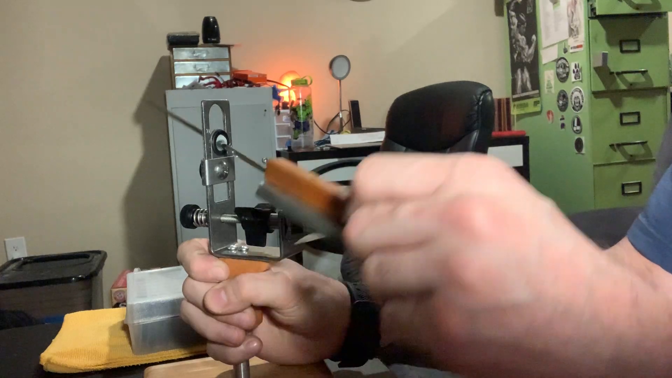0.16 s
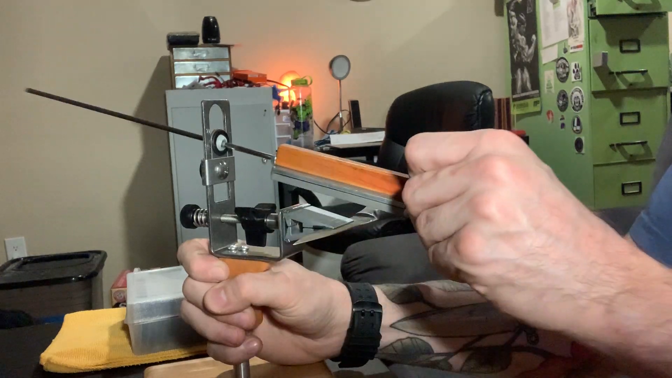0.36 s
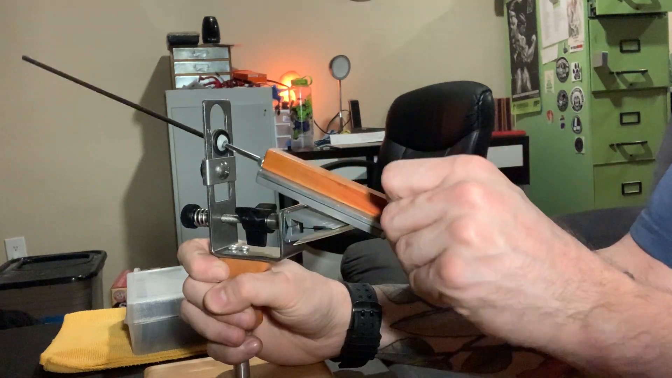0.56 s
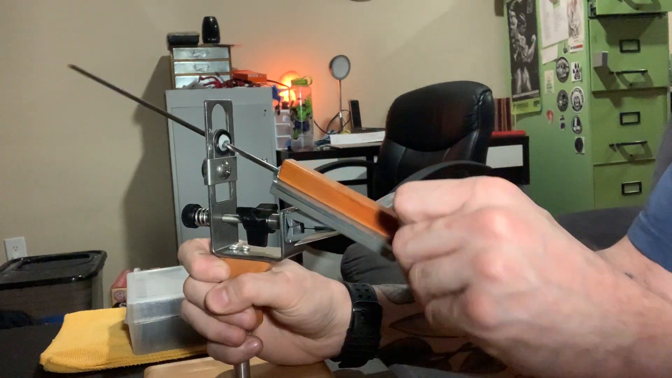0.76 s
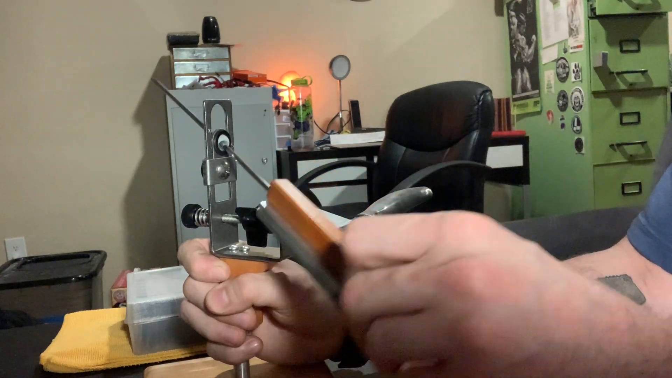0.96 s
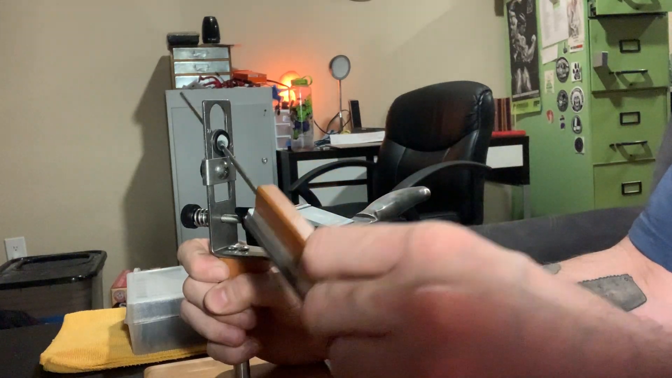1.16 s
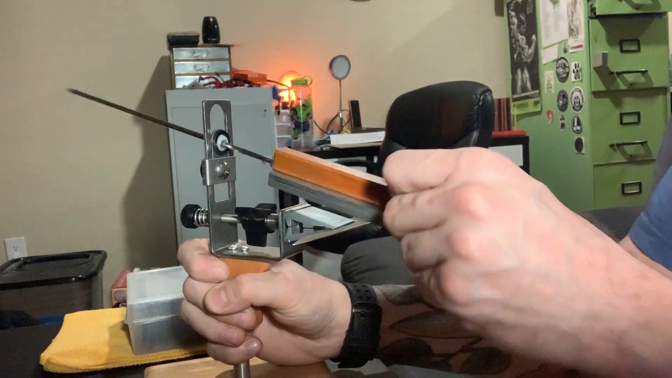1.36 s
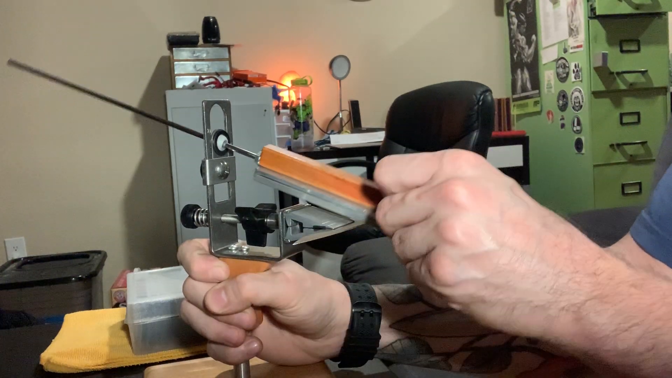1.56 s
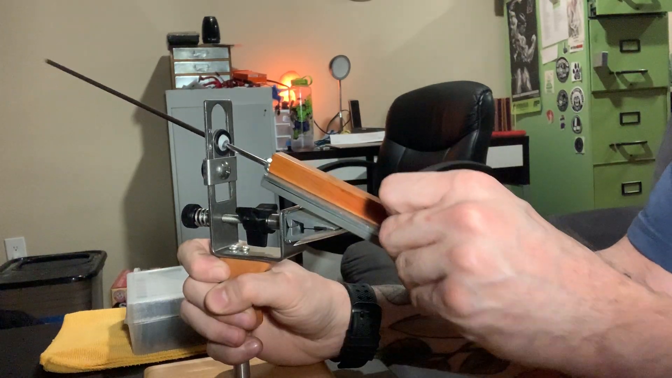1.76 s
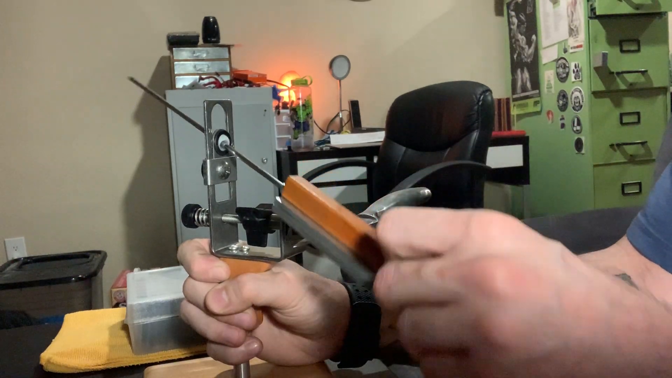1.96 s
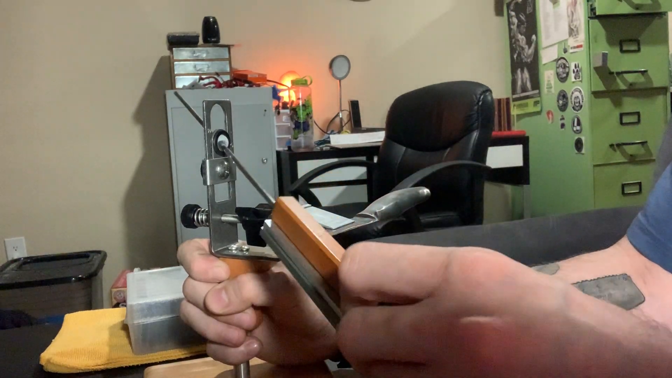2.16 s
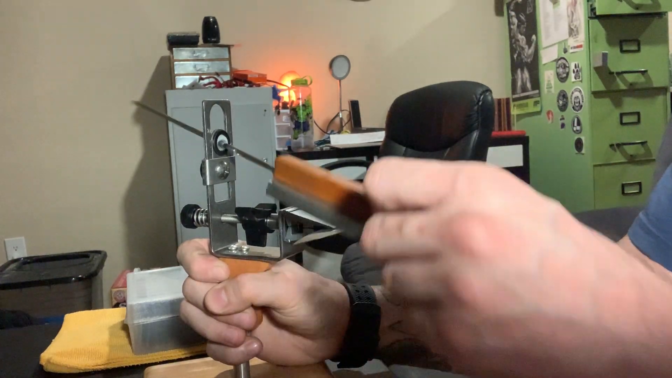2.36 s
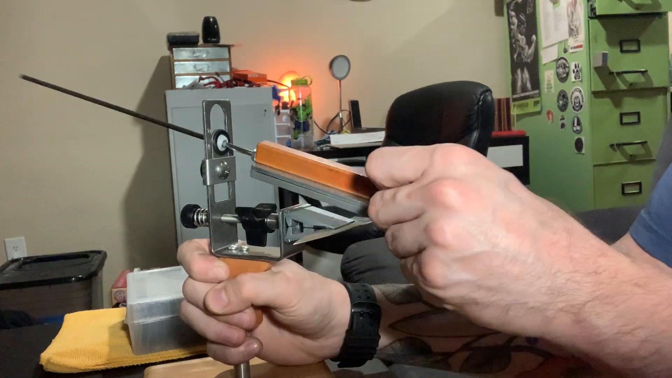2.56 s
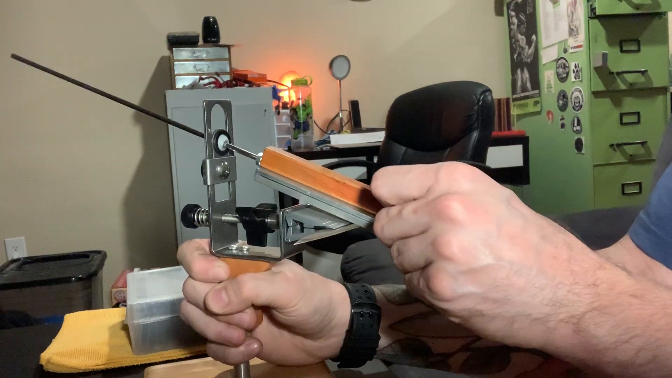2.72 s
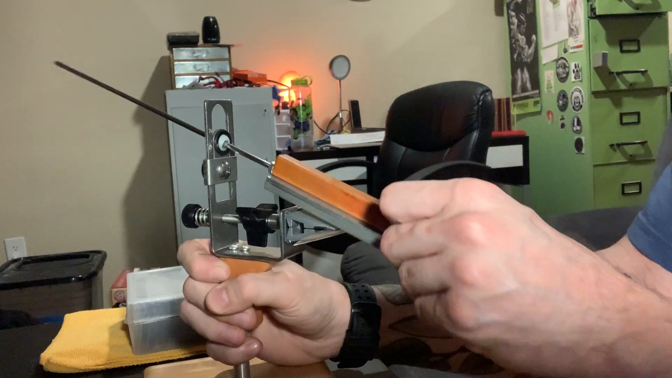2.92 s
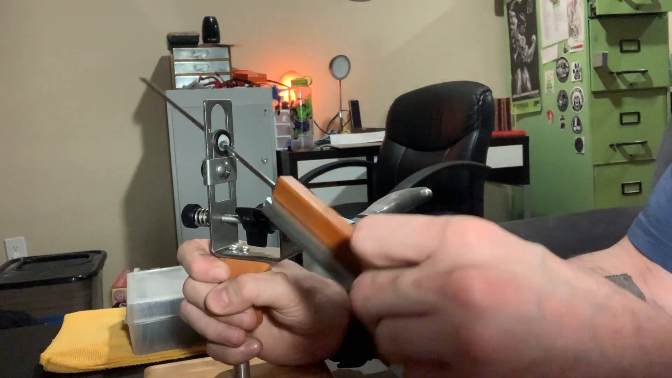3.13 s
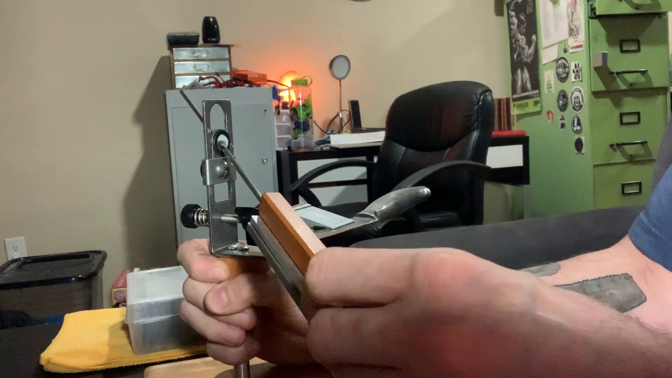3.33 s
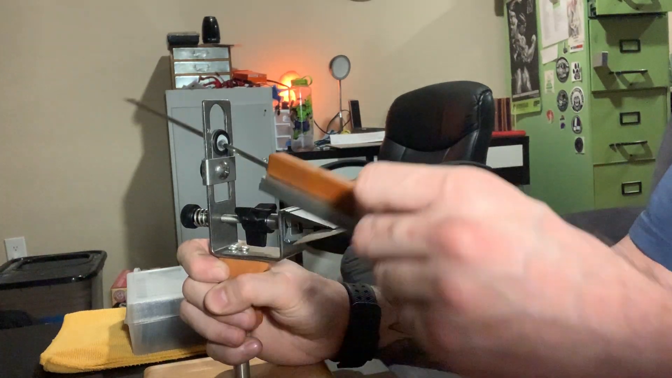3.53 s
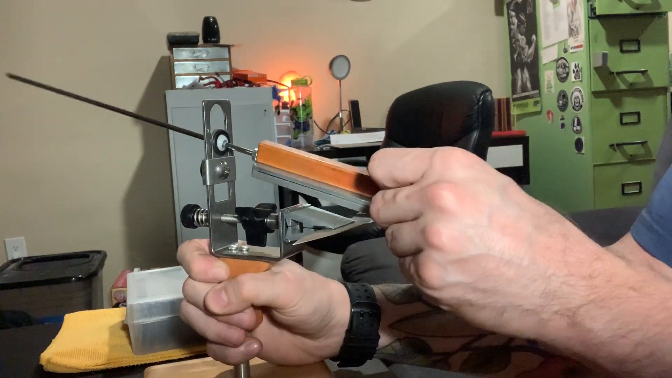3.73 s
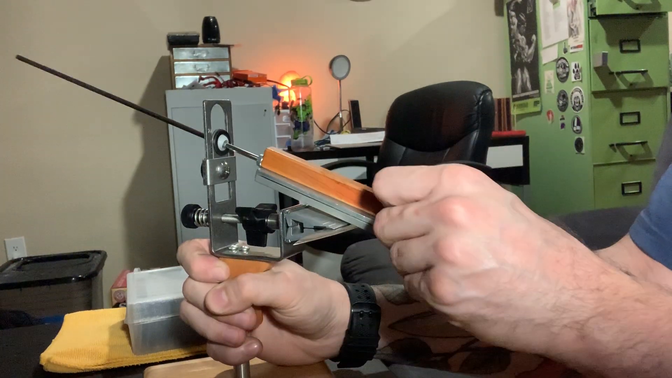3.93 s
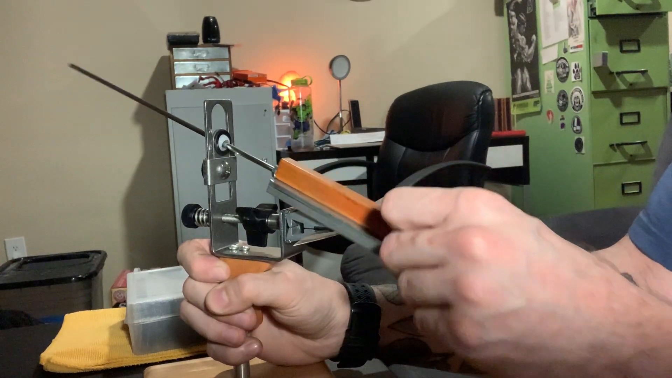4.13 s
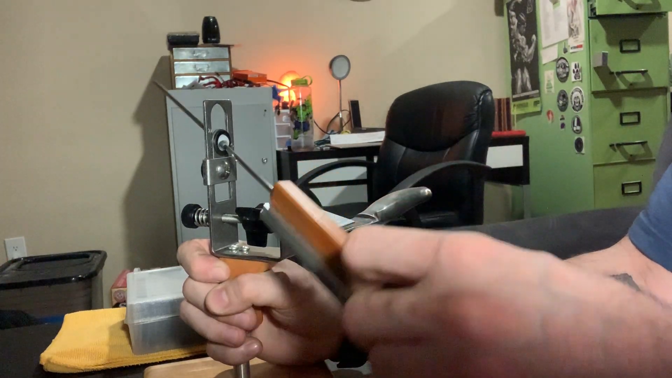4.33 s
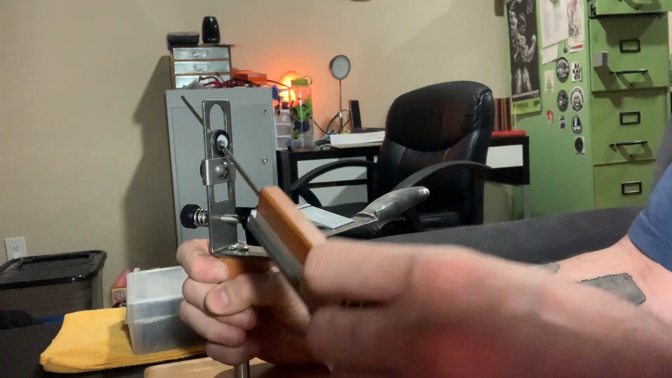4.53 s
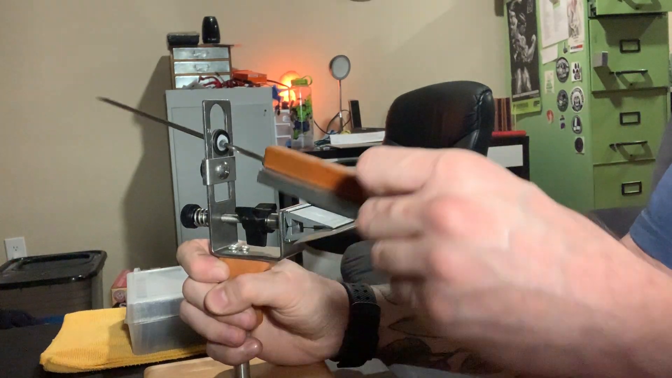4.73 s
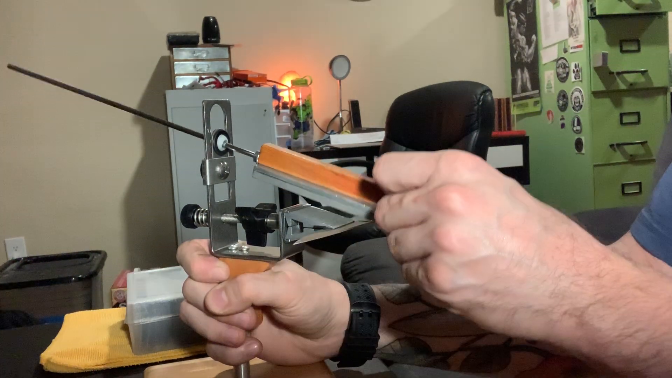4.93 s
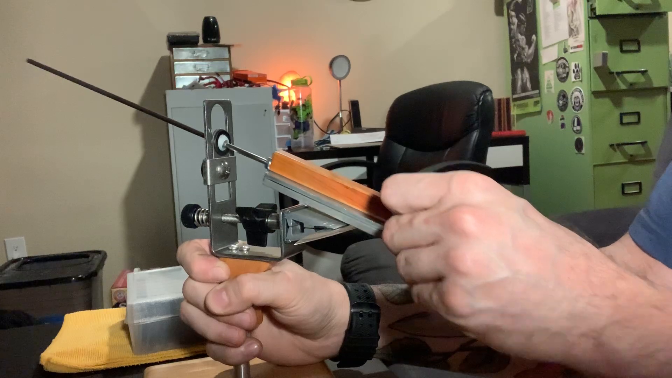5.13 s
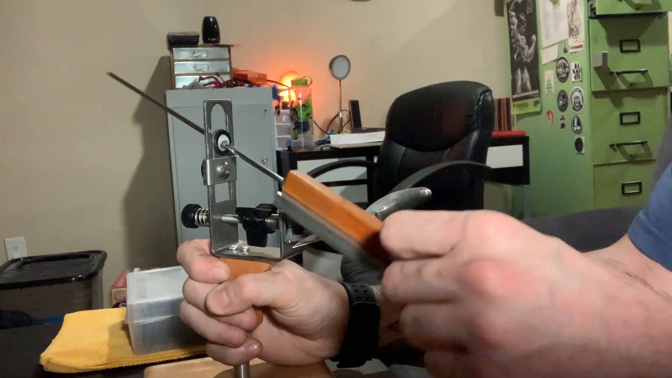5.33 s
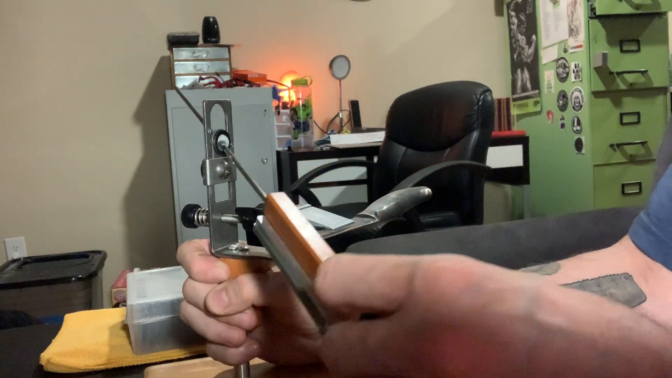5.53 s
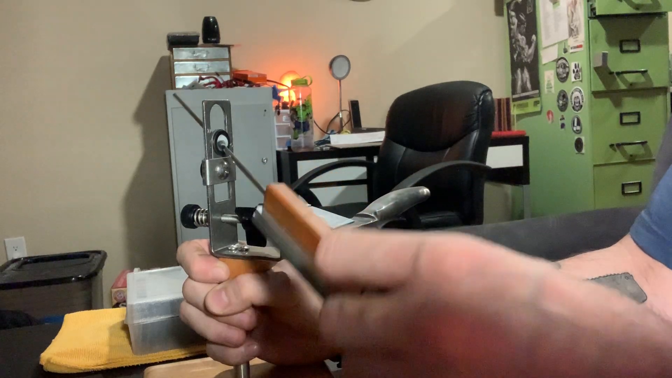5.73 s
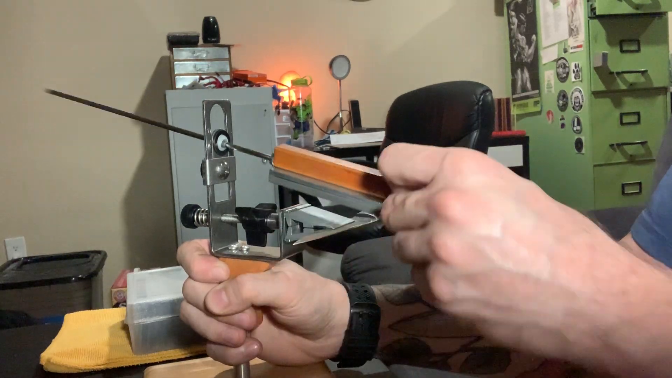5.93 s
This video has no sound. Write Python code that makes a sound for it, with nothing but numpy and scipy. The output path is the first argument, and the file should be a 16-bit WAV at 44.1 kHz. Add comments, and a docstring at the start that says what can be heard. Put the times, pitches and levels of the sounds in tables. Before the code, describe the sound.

A close stereo recording in a small room with short reverberation: a coarse stone on a guide rod is drawn along a clamped knife. At the start, the end of a stroke rubs and squeaks faintly until about 0.1 s. Full strokes land near 0.6, 1.7, 2.8, 3.9 and 5.1 s, each lasting about 0.6 s. A small hard knock with a dull clamp thump opens each one; then a bright, grainy hiss swells with the stone's speed and fades, over thin steel ringing near 1.5 kHz and soft low rumble. A faint rod tone falls while another rises. Sharp little ticks are scattered through the strokes, notably around 0.8, 1.7 to 2.1 and 5.4 s. Slowing ends catch with short rubs and squeals, clearest near 2.1 and 3.25 s. Gaps of about half a second hold barely audible rod sliding, quiet air noise and weak low hum.

```python
"""A coarse stone on a guide rod is drawn along a clamped knife in a small room, stroke after stroke.
The grit hisses in proportion to its speed, blade and edge ring as resonators, and the handle rumbles.
Each landing knocks, coarse grains tick as they snap off, and the slow stone rubs and squeals by stick-slip.
The sliding rod adds one falling and one rising resonance to each stroke; quiet air noise and hum lie beneath."""
import sys
import numpy as np
from scipy import signal
from scipy.fft import rfft, irfft, next_fast_len
from scipy.io import wavfile
from scipy.ndimage import uniform_filter1d, map_coordinates

SR = 44100
rng = np.random.default_rng(int(sys.argv[2]) if len(sys.argv) > 2 else 0)


def bounce(signal):
    """Save signal as a 16-bit WAV file at the path given by the first command-line argument."""
    frames = np.transpose(np.atleast_2d(signal))
    limited = np.clip(frames, -1, 1)
    pcm = np.round(limited * 32767).astype(np.int16)
    wavfile.write(sys.argv[1], SR, pcm)


N = 263718
TIME = np.arange(N) / SR  # s

# Table levels are relative: the functions that play them apply further trims in dB.


def amp(db):
    """Decibel law: 20 dB is a factor of ten in amplitude."""
    return 10 ** (np.asarray(db) / 20)


def unit(x):
    """Normalisation to a root-mean-square value of 1."""
    return x / np.sqrt(np.mean(x ** 2) + 1e-20)


def along(points, hz):
    """Linear interpolation of (f/Hz, value) points on a logarithmic frequency axis."""
    f, v = np.transpose(points)
    return np.interp(np.log(hz + 1), np.log(f + 1), v)


def wobble(rate):
    """Spline interpolation of random knots, rate a second, into a smooth fluctuation."""
    return map_coordinates(rng.standard_normal(int(N * rate / SR) + 4), [TIME * rate])


def filtered(x, response):
    """Linear filtering: the spectrum of x times a complex response of frequency."""
    size = 2 * next_fast_len(x.shape[-1] // 2 + 8192)
    spectrum = rfft(x, size) * response(np.fft.rfftfreq(size, 1 / SR))
    return irfft(spectrum, size)[..., :x.shape[-1]]


def coloured(x, spectrum):
    """Minimum-phase filtering: a folded cepstrum makes the (f/Hz, level/dB) shape causal."""
    def response(hz):
        cepstrum = irfft(np.log(amp(along(spectrum, hz))))
        half = len(cepstrum) // 2
        return np.exp(rfft(np.r_[cepstrum[0], 2 * cepstrum[1:half]], 2 * half))
    return filtered(x, response)


def ringing(x, modes):
    """Modal superposition: parallel damped resonances, of alternating sign, driven by x."""
    def response(f):
        total = 0
        for k, (centre, width, db) in enumerate(modes):
            resonance = 1j * f * width / (centre * centre - f * f + 1j * f * width)
            total = total + (-1) ** k * amp(db) * resonance
        return total
    return filtered(x, response)


def add(track, s, sound):
    """Superposition: mix a sound into a track at s seconds."""
    part = track[max(round(s * SR), 0):][:len(sound)]
    part += sound[:len(part)]


def swells(rows):
    """Gaussian envelopes centred at t/s, down to exp(-2) one length/s away, peaking at level/dB."""
    return sum(amp(db) * np.exp(-2 * ((TIME - s) / length) ** 2) for s, length, db in rows)


def grains(rate, spread_db):
    """Shot noise: tiny fractures of random sign and size, rate a second on average, at rms 1."""
    hit = rng.random(N) < rate / SR
    return unit(hit * rng.choice([-1, 1], N) * amp(spread_db * rng.standard_normal(N)))


def shifting(x, patchy_db):
    """Time-varying spectrum: the moving contact point favours ever different frequencies."""
    z = signal.stft(x, nperseg=512)[2]
    field = uniform_filter1d(rng.standard_normal(z.shape), size=4, axis=0)  # smooth over frequency
    field = uniform_filter1d(field, size=8, axis=1)  # smooth over time
    return unit(signal.istft(z * amp(patchy_db * unit(field)), nperseg=512)[1][:N])


def bent(x, stretch):
    """Time-scale warping: reading x faster raises all its resonances by a moving share."""
    return map_coordinates(x, [np.cumsum(1 + stretch) % (N - 1)])


def burst(t60, spike_db):
    """Impulsive excitation: a sharp break in a crunch of noise that falls 60 dB in t60 seconds."""
    t = TIME[:SR // 8]
    crunch = rng.standard_normal(len(t)) * amp(-60 * t / t60)
    crunch[SR // 2000] += amp(spike_db)
    return crunch


# spectrum of the room noise: f/Hz, level/dB
AIR_SPECTRUM = [(15, -92), (25, -15.5), (72, -1), (161, -4), (206, -4), (285, -8), (317, -14), (394, -13.5),
                (677, -17.5), (754, -20), (1400, -25.5), (1740, -24.5), (4250, -34.5), (12500, -43),
                (16000, -50)]
# left-right correlation of that noise: f/Hz, likeness/1
AIR_LIKENESS = [(60, 0.348), (200, 0.217), (500, 0.033), (2000, 0.029)]
# tones of the hum: f/Hz, level/dB
HUM_TONES = [(120, -87), (140, -73.5), (210, -68.5), (241, -97.5), (280, -77)]
AIR_DB = -60.5  # rms level of the noise


def air():
    """Partial coherence: mid and side noises set the left-right likeness; a faint unsteady hum joins them."""
    mid, side = unit(coloured(rng.standard_normal((2, N)), AIR_SPECTRUM))

    def turn(hz):
        return np.arccos(np.clip(along(AIR_LIKENESS, hz), -1, 1)) / 2

    mid = filtered(mid, lambda hz: np.cos(turn(hz)))
    side = filtered(side, lambda hz: np.sin(turn(hz)))
    hum = 0
    for hz, db in HUM_TONES:
        phase = 2 * np.pi * hz * TIME + 1.26 * wobble(11)
        hum = hum + amp(db + 2.0 * wobble(18)) * np.sin(phase)
    return amp(AIR_DB) * np.array([mid + side, mid - side]) + hum


# reverberation time of the room: f/Hz, t60/s
ROOM_DECAY = [(150, 0.35), (1500, 0.21), (6000, 0.27), (14000, 0.11)]
# strength of the room's answer: f/Hz, level/dB
ROOM_LEVEL = [(80, -9.5), (450, 3), (1400, -13), (3000, -0.5), (6000, -3.5), (9000, -3), (13000, -19)]


def room(x):
    """Diffuse reverberation: decaying noise, different at each microphone, is the walls' impulse response."""
    hz, t, z = signal.stft(rng.standard_normal((2, SR // 3)), SR, nperseg=256)
    decay = amp(-60 * t / along(ROOM_DECAY, hz)[:, None])
    decay *= amp(along(ROOM_LEVEL, hz))[:, None] / np.sqrt(np.mean(decay ** 2, axis=1, keepdims=True))
    tail = signal.istft(z * decay, SR, nperseg=256)[1] / np.sqrt(SR // 3)
    delayed = np.pad(x, (SR // 300, 0))[None]  # the walls answer 1/300 s late
    return signal.fftconvolve(delayed, tail, axes=1)[:, :N]


def room_along(x, travel, count):
    """Position-dependent reverberation: hand and stone move through count places with different answers."""
    nearness = [np.maximum(1 - np.abs(travel * (count - 1) - place), 0) for place in range(count)]
    return sum(room(x * np.sqrt(share)) for share in nearness)


# level difference of the direct sound: f/Hz, left minus right level/dB
PORT_BALANCE = [(50, 13), (100, -3), (200, 5.5), (380, 10), (700, 2), (1400, -1), (2400, 3.5), (4400, -5.5),
                (8100, 6), (11000, 0.5), (15000, -0.5)]
# phase lag of the left microphone port behind the right: f/Hz, phase/rad
PORT_LAG = [(100, 0), (700, .5), (1400, 1.15), (2500, 2.1), (3600, 3), (4800, 3.5), (5400, 4.7),
            (6100, 6.3), (7000, 8.2), (7800, 9), (9500, 8), (12000, 6.3), (14000, 4.9), (15500, 3.3)]


def at_ports(x):
    """Interaural-style differences: each port takes half the level difference and half the phase lag."""
    def port(side):
        def response(hz):
            level = amp(side * along(PORT_BALANCE, hz) / 2)
            return level * np.exp(-.5j * side * along(PORT_LAG, hz))
        return filtered(x, response)
    return np.array([port(side) for side in (1, -1)])


# resonances of the blade: f/Hz, width/Hz, level/dB
BLADE_MODES = [(836, 125, -13), (958, 89, -11), (1365, 133, -1.5), (1440, 29, 7), (1499, 24, 1),
               (1659, 27.6, 2.5), (1766, 79, -8.5)]


def blade_ring(x):
    """Modal resonance of the clamped blade."""
    return ringing(x, BLADE_MODES)


# resonances of the edge: f/Hz, width/Hz, level/dB
EDGE_MODES = [(2316, 290, -7), (3100, 280, -3.5), (4340, 280, 2), (5655, 340, -2), (6516, 98, 1.5),
              (8200, 146, 2.5), (9270, 280, -6.5), (11320, 162, 0.5), (13860, 313, -23), (14540, 500, -16)]


def edge_ring(x):
    """Modal resonance of the steel at the edge, higher and broader than the blade's."""
    return ringing(x, EDGE_MODES)


# spectrum of the hissing grit: f/Hz, level/dB
GRIT_SPECTRUM = [(300, -73), (2000, -23), (2800, -23), (3350, -0.5), (4000, -24), (5400, -2), (6900, -12.5),
                 (8400, 1), (10000, -1), (12100, 0.5), (13100, 3), (14300, 2.5), (15300, 5), (16000, -28)]


def grit_hiss(x):
    """Spectral shaping of grain fractures into a bright hiss."""
    return coloured(x, GRIT_SPECTRUM)


# the rod rubs in its guide on the way back: t/s, length/s, blade ring level/dB, hiss level/dB
RETURN_RUBS = [(0.268, 0.11, -72.5, -90), (1.414, 0.17, -77, -90), (2.486, 0.059, -71.5, -86),
               (2.576, 0.043, -80, -79), (3.62, 0.053, -73, -81), (4.766, .05, -66.5, -81)]


def returns():
    """Structure-borne friction: with the stone lifted, the sliding rod hisses and faintly stirs the blade."""
    ring = swells((s, length, db) for s, length, db, _ in RETURN_RUBS)
    hiss = swells((s, length, db) for s, length, _, db in RETURN_RUBS)
    drive = grains(rate=2500, spread_db=6.5)
    steel = unit(blade_ring(drive)) + amp(-12.0) * unit(edge_ring(drive))
    return ring * steel + hiss * unit(grit_hiss(drive))


# single coarse grains catch on the edge: t/s, level/dB
SNAG_TICKS = [(0.7063, -41.5), (0.7744, -27), (0.8135, -33.5), (0.8646, -34), (1.1609, -39), (1.185, -40),
              (1.717, -28), (1.7197, -31), (1.7296, -33), (1.7745, -29.5), (1.8895, -34), (2.062, -30),
              (2.1, -37.5), (2.2315, -39), (2.251, -47), (2.966, -34), (3.0671, -36), (3.1668, -34),
              (3.9105, -31), (4.4825, -42), (4.5312, -41.5), (5.3622, -26)]
# spectrum of a tick: f/Hz, level/dB
SNAG_SPECTRUM = [(500, -9), (3500, -9), (6000, 0), (8500, 8.5), (11000, 4.5), (13500, 8.5), (15500, 2),
                 (16400, -59)]


def snags():
    """Brittle fracture: coarse grains snap off with a short bright tick."""
    ticks = np.zeros(N)
    for s, db in SNAG_TICKS:
        add(ticks, s, amp(db) * burst(t60=.012, spike_db=0))
    return amp(-1.5) * coloured(ticks, SNAG_SPECTRUM)


# the stone lands, or the blade is jolted: t/s, crack level/dB, blade ring level/dB,
# level of the thump of the hand-held clamp/dB
KNOCK_EVENTS = [(0.6124, -32, -27, -37.5), (0.6214, -48, -26, -33), (1.182, -55, -38, -58),
                (1.672, -40, -34.5, -40.5), (1.686, -63, -56, -48), (2.7651, -40, -41, -39),
                (2.7784, -32.5, -53, -40), (2.847, -59, -33, -65), (3.9111, -30, -31.5, -37),
                (4.752, -69, -51, -68.5), (5.0601, -32, -28.5, -37.5), (5.066, -37, -43, -53),
                (5.704, -54, -40.5, -52)]
# spectrum of the crack: f/Hz, level/dB
KNOCK_SPECTRUM = [(100, -10.5), (500, -1), (800, 2), (1150, 11.5), (1550, 3), (2400, -6.5), (3300, 7.5),
                  (4000, 5.5), (4700, 7), (7300, -5), (9000, 9), (11500, -17), (14500, 5), (16300, -28.5)]
# rocking modes of the clamp, before a random detuning at each knock: f/Hz, t60/s, level/dB
CLAMP_MODES = [(92.5, 0.18, 1.5), (107, 0.084, 3), (197.2, 0.13, -5.5)]


def knocks():
    """Impact excitation: a crack, a free ring of the steel, and the clamp rocking a moment later."""
    cracks, blows, thumps = np.zeros(N), np.zeros(N), np.zeros(N)
    t = TIME[:SR // 3]
    for s, crack_db, ring_db, thump_db in KNOCK_EVENTS:
        add(cracks, s, amp(crack_db) * burst(t60=0.024, spike_db=12))
        add(blows, s, amp(ring_db) * burst(t60=0.07, spike_db=0.0))
        rock = 0
        for hz, t60, level in CLAMP_MODES:
            detuned = hz * (1 + 0.065 * rng.standard_normal())
            rock = rock + amp(level - 60 * t / t60) * np.sin(2 * np.pi * detuned * t)
        add(thumps, s + 0.00734, amp(thump_db) * rock * (1 - np.exp(-t / 0.0091)))
    crack = amp(-1.0) * coloured(cracks, KNOCK_SPECTRUM)
    steel = amp(6.5) * blade_ring(blows) + amp(-3) * edge_ring(cracks)
    return crack + steel + amp(-1.5) * thumps


def gliding(hz, width_hz):
    """Amplitude modulation: low-passed noise on a moving carrier is a gliding resonance, at rms 1."""
    phase = 2 * np.pi * np.cumsum(hz) / SR
    shake = filtered(rng.standard_normal((2, N)), lambda f: 1 / (1 + 1j * f / width_hz) ** 2)
    return unit(shake[0] * np.cos(phase) + shake[1] * np.sin(phase))


# between guide and stone the rod lengthens, so its tone falls and fades
SPAN_HZ, SPAN_GROWS = 1545, 2.6  # pitch at the landing; length gained over a stroke, as a share
SPAN_FADE_DB, SPAN_ATTACK_S = 75, 0.072  # level lost over a stroke; time to build up
# the rod's overhang shortens, so its tone rises (place and 1/e half-width as shares of the travel)
TIP_HZ, TIP_SHRINKS, TIP_LOUDEST_AT, TIP_WIDTH = 2800, .22, 0.24, 0.12


def rod(age, contact, travel, span_db, tip_db):
    """Bending waves in a bar: each of the rod's two parts rings at a pitch as one over its length squared."""
    span = gliding(SPAN_HZ / (1 + SPAN_GROWS * travel) ** 2, width_hz=74)
    span = span * amp(span_db - SPAN_FADE_DB * travel) * np.minimum(age / SPAN_ATTACK_S, 1)
    tip = gliding(TIP_HZ / (1 - TIP_SHRINKS * travel) ** 2, width_hz=70)
    tip = tip * amp(tip_db) * np.exp(-((travel - TIP_LOUDEST_AT) / TIP_WIDTH) ** 2)
    judder = unit(amp(3 * wobble(70)))
    return contact * judder * amp(3.0) * (span + tip)


# strokes: landing t/s, length on the edge/s, time to top speed/s, speed-up 1/e width/s,
# slow-down 1/e width/s, then level/dB of grit hiss, edge ring, blade ring, handle rumble,
# falling rod tone and rising rod tone
STROKE_ROWS = [(-0.55, 0.66, 0.4, 0.11, 0.14, -51, -54.5, -62, -54.5, -60, -66),
               (0.612, 0.6, .22, 0.11, 0.14, -45, -53, -56.5, -53, -59, -62.5),
               (1.673, 0.56, .33, .22, 0.1, -44, -49.5, -54.5, -53.5, -61, -68),
               (2.765, 0.61, 0.31, 0.12, .16, -46.5, -51, -56, -55, -57.5, -77),
               (3.911, .64, .32, .105, .15, -47, -50.5, -57, -54, -54.5, -74),
               (5.06, 0.55, 0.29, 0.12, 0.13, -45, -51, -53, -53.5, -52.5, -59)]
CREEP = .095  # floor of the speed, as a share of top speed
LAND_S, LIFT_DB_PER_S = .025, 259  # the contact builds up, and dies away as the stone lifts


def motion():
    """Kinematics of the hand: age/s, contact, speed and travel (each 0-1) and six levels/dB of the stroke."""
    controls = np.zeros((10, N))
    for s, length, fastest, speed_up, slow_down, *levels_db in STROKE_ROWS:
        t = np.arange(2 * SR) / SR
        width = np.where(t < fastest, speed_up, slow_down)
        speed = CREEP + (1 - CREEP) * np.exp(-((t - fastest) / width) ** 2)
        contact = np.minimum(t / LAND_S, 1) * amp(-LIFT_DB_PER_S * np.maximum(t - length, 0))
        travel = np.cumsum(speed * contact) / np.sum(speed * contact)
        now = TIME >= s  # each stroke takes over from the one before
        controls[:4, now] = [np.interp(TIME[now] - s, t, c) for c in (t, contact, speed, travel)]
        controls[4:, now] = np.array(levels_db)[:, None]
    return controls


# the blade's narrowest modes, as sung: f/Hz, level/dB
SINGING_TONES = [(1445, 0.5), (1520, -7.5), (1685, -13)]


def singing():
    """Stick-slip self-oscillation: friction locks on to the narrowest modes as wavering tones."""
    tones = 0
    for hz, db in SINGING_TONES:
        phase = 2 * np.pi * hz * TIME + 1.1 * wobble(38) + .35 * wobble(300)
        tones = tones + amp(db + 3 * wobble(60)) * np.sin(phase)
    return unit(tones)


def reflected(x, travel, shortest, longest, strength):
    """Comb filtering: inverted waves return from both blade ends, one path growing as the other shrinks."""
    delays = [shortest + (longest - shortest) * share for share in (travel, 1 - travel)]  # s
    return unit(x - strength * sum(np.interp(TIME - delay, TIME, x) for delay in delays))


# the slowing stone catches and gives a short extra rub: t/s, length/s, hiss level/dB
EXTRA_RUBS = [(0.01, 0.046, -57.5), (0.11, 0.019, -60), (1.08, 0.02, -55.5), (1.19, 0.02, -53.5),
              (2.245, 0.022, -58), (3.39, 0.039, -67), (4.44, 0.055, -55), (4.53, 0.048, -58.5),
              (5.555, 0.034, -61)]
# the slow stone sticks and slips, and the blade squeals: t/s, length/s, blade ring level/dB
BLADE_SQUEALS = [(0.02, 0.09, -53), (0.65, 0.043, -49), (1.075, 0.073, -50.5), (2.105, 0.069, -46),
                 (2.855, 0.025, -44), (3.23, 0.023, -39), (3.28, 0.03, -42), (4.395, 0.055, -45.5),
                 (4.52, 0.047, -51), (5.53, 0.064, -52.5)]
# spectrum of the handle's rumble: f/Hz, level/dB
HANDLE_SPECTRUM = [(20, -46), (45, 4.5), (90, 2), (130, 5.5), (200, -6.5), (300, -13.5), (550, -19),
                   (1000, -18.5), (2000, -65), (4000, -53)]
RUB_EDGE_DB, SQUEAL_EDGE_DB = 0.5, -11  # edge drive over a rub's hiss and over a squeal's blade ring
EDGE_GROWS, BLADE_GROWS = 0.3, 0.09  # amplitude as a power of speed; the hiss is in proportion to it
HANDLE_FADE_DB, EDGE_FADE_DB = 5, 2.5  # level lost from one end of a stroke to the other


def rasp(contact, speed, travel, hiss_db, edge_db, blade_db, handle_db):
    """Abrasive friction: grit tears at the edge, so hiss, edge and handle chatter together and the blade rings."""
    rubs, squeals = swells(EXTRA_RUBS), swells(BLADE_SQUEALS)
    hiss = np.hypot(contact * amp(hiss_db) * speed, rubs)
    edge_stroke = contact * amp(edge_db - EDGE_FADE_DB * travel) * speed ** EDGE_GROWS
    edge = np.hypot(edge_stroke, amp(RUB_EDGE_DB) * rubs + amp(SQUEAL_EDGE_DB) * squeals)
    blade = np.hypot(contact * amp(blade_db) * speed ** BLADE_GROWS, squeals)
    handle = contact * amp(handle_db - HANDLE_FADE_DB * travel)
    chatter = unit(amp(1.6 * wobble(70) + 1.5 * wobble(280)))

    grit = grains(rate=6500, spread_db=4.5)
    grit = reflected(grit, travel, shortest=0.00046, longest=0.0013, strength=0.44)
    hiss = hiss * amp(1) * shifting(grit_hiss(grit), patchy_db=4.0)

    # the stone stiffens the blade most in mid-stroke, so the modes arch up and come back
    stiffening = np.sin(np.pi * travel) ** 2
    edge_tone = bent(edge_ring(grains(rate=3900, spread_db=10.0)), .1 * stiffening)
    edge = edge * amp(-3.5) * shifting(edge_tone, patchy_db=5.0)
    ring = unit(bent(blade_ring(grains(rate=2700, spread_db=1.0)), .025 * stiffening))

    # the harder the blade is driven, the more it sings its narrowest modes
    sing = blade ** 2 / (blade ** 2 + amp(-47) ** 2)
    blade = blade * amp(1.5) * ((1 - sing) * ring + sing * singing())

    rumble = unit(coloured(grains(rate=2500, spread_db=2.5), HANDLE_SPECTRUM))
    handle = handle * amp(-2.0) * rumble
    return chatter * (hiss + edge + handle) + blade


def scene():
    """Direct and reverberant fields: the ports differ in colour and lag; the long scrape fills the room most."""
    age, contact, speed, travel, *rasp_db, span_db, tip_db = motion()
    scrape = rasp(contact, speed, travel, *rasp_db)
    scrape = scrape + rod(age, contact, travel, span_db, tip_db) + returns()
    hits = knocks() + snags()
    direct = at_ports(scrape + hits)
    reverberant = room_along(amp(3.5) * scrape + amp(1) * hits, travel, count=5)
    return direct + reverberant + air()


TOP_HZ = 16400  # band limit


def record(dry):
    """Ideal low-pass filtering: nothing above the band limit passes."""
    return filtered(dry, lambda hz: hz < TOP_HZ)


dry = scene()
out = record(dry)
bounce(out)
```